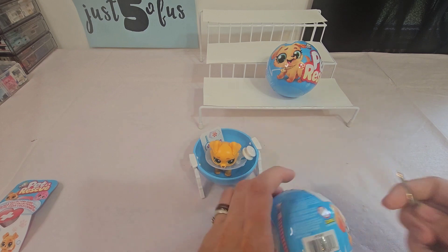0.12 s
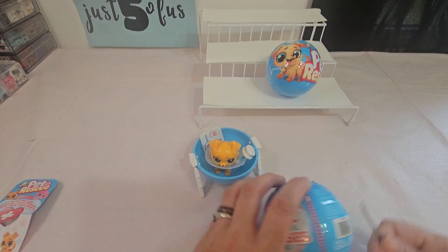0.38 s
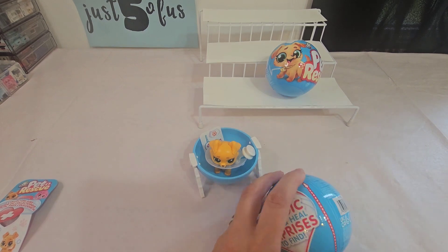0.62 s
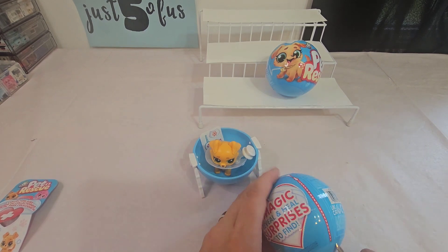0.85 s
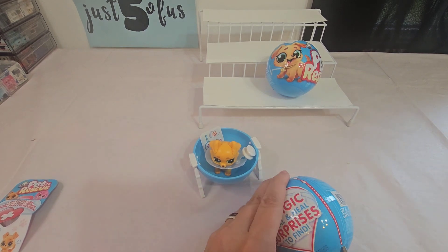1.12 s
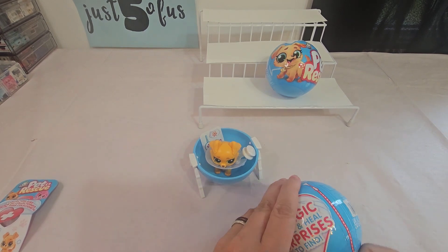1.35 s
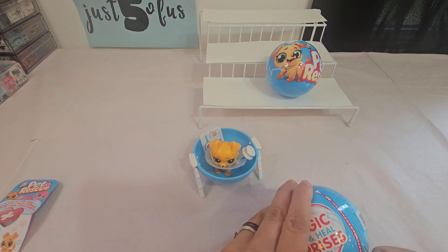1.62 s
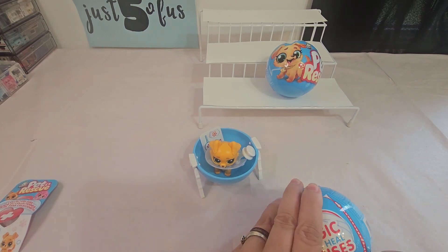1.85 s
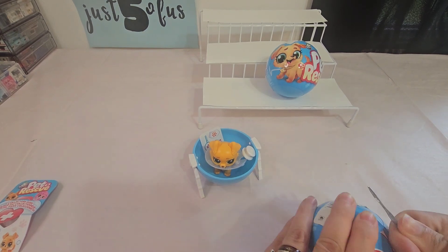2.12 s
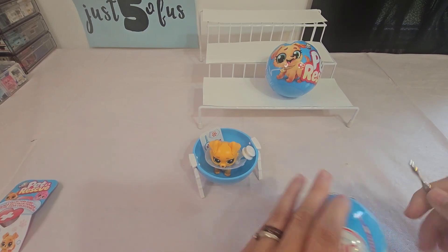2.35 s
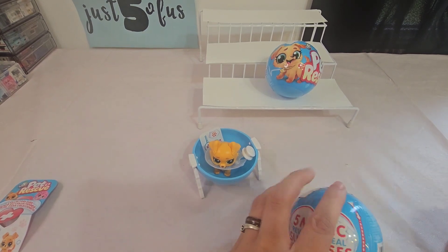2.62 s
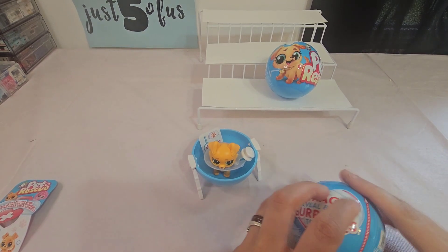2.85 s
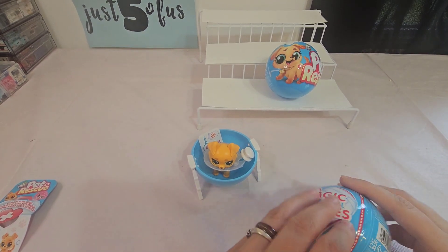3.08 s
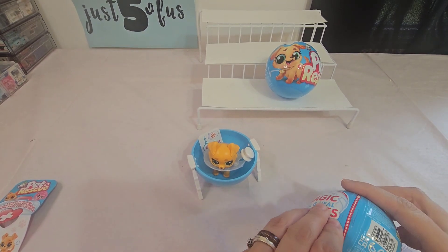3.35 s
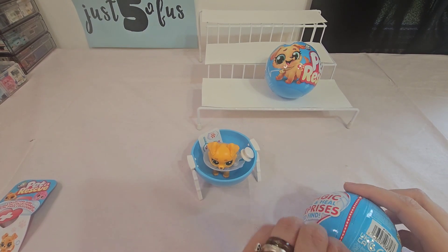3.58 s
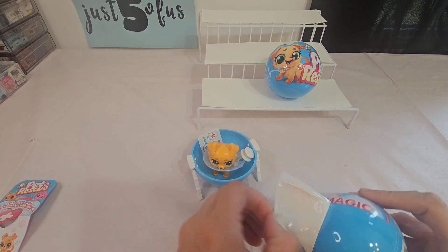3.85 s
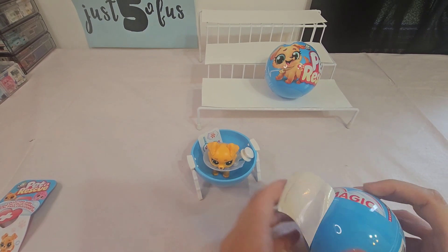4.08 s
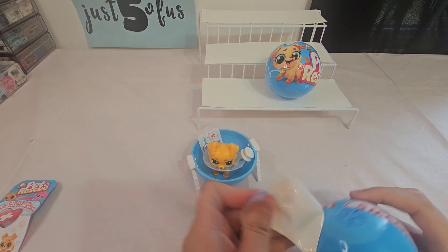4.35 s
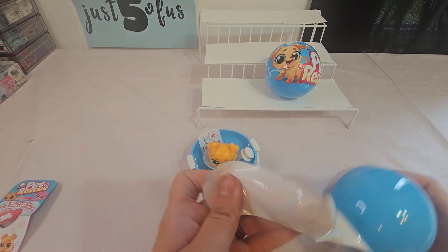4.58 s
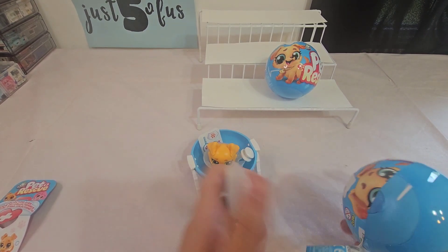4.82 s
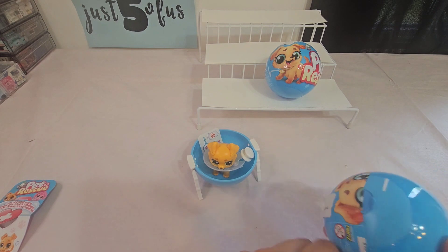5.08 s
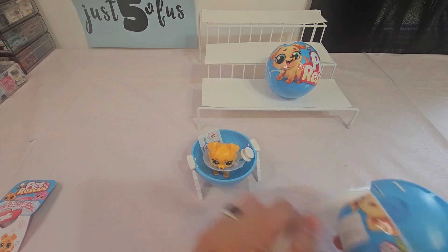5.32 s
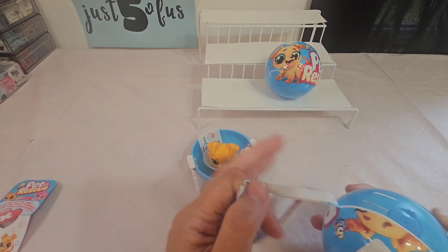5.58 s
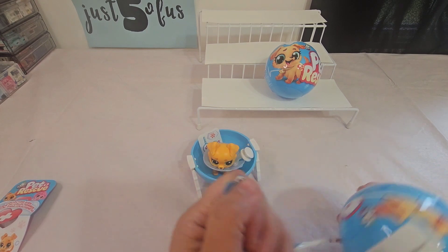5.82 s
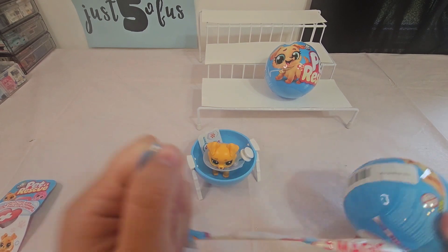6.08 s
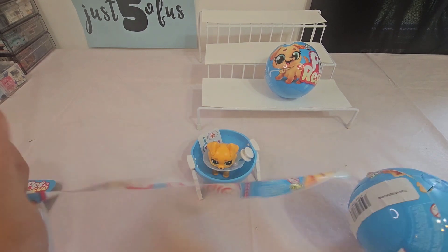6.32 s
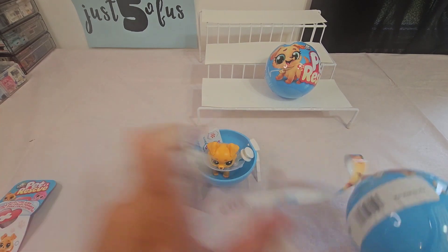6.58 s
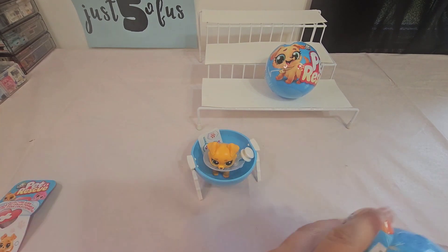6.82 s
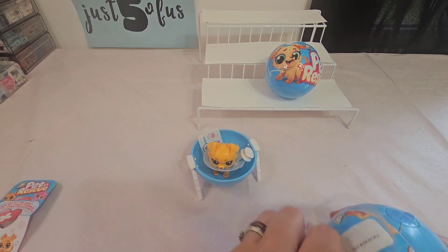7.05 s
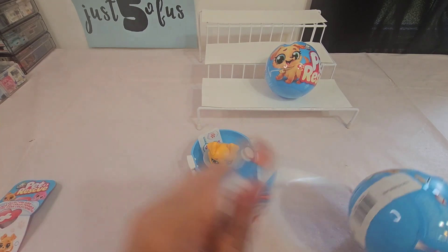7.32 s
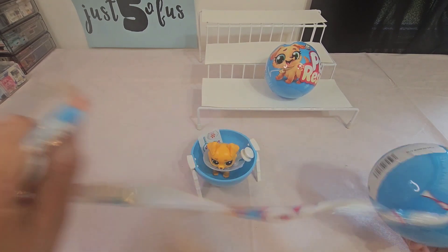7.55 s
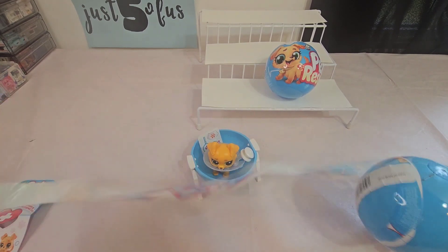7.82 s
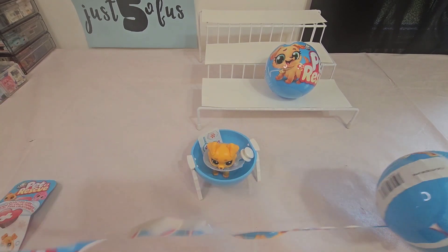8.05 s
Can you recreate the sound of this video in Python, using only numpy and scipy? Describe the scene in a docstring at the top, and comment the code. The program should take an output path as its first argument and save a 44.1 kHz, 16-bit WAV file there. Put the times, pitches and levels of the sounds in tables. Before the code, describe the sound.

Close up in a small quiet room, a hollow plastic ball thuds on a cloth-covered table and rubs briefly. Faint film ticks follow, with sharp snaps around two seconds. Near four seconds the shrink wrap starts tearing, bursting into loud dense crackling, then continuing in uneven crisp pops and rustles to the end. Stereo phone microphone, short soft echo, low hush.

```python
"""Film snaps, crackles and rustles while a hollow plastic ball thuds and rubs on a table, in a small quiet room.
Hands turn the ball on a cloth-covered table and peel its shrink film off, close to a phone.
Snaps are single bursts of shaped noise with a ring, rustle is noise driven by swarms of tiny creases,
thuds and drags are forces driving resonant table modes; a noise tail gives the echo, shaped noise the hush."""
import sys
import numpy as np
from scipy import signal
from scipy.fft import rfft, irfft, next_fast_len
from scipy.io import wavfile
from scipy.ndimage import uniform_filter1d

SR = 44100
rng = np.random.default_rng(int(sys.argv[2]) if len(sys.argv) > 2 else 0)


def put_to_file(sound):
    """Save the sound as 16-bit audio at rate SR, in the file named by the first command-line argument."""
    columns = np.atleast_2d(sound).T  # one column per channel
    safe = np.clip(columns, -1, 1)
    whole_steps = np.round(safe * 32767)
    wavfile.write(sys.argv[1], SR, whole_steps.astype(np.int16))


def boost_factor(decibels):
    """Convert a level in decibels to a linear amplitude factor."""
    exponent = np.asarray(decibels, float) / 20
    return 10 ** exponent


N = 360738

# where the hands work: t/s, left minus right/dB
HANDS = [(0.0, 6), (0.39, -3.5), (0.84, 4), (1.55, -4), (2.32, -2), (6.29, -1), (6.42, 4.5), (6.7, -2),
         (8.18, 4)]
# colour of the film as heard through the phone's ports: f/Hz, gain/dB
FILM = [(88, -50), (150, 1.5), (240, 5), (406, -2), (888, 0.5), (1170, 0), (1940, -1.5), (2100, -3.5),
        (4160, -2.5), (8560, -6), (11700, -6), (15100, 3.5), (16000, -32.5)]
# centres of the dull, middle and sizzle bands: f/Hz
BANDS_HZ = (900, 4200, 12000)


def colour(hz, points):
    """Gain at hz of (f/Hz, gain/dB) points, joined over log frequency."""
    f, db = np.transpose(points)
    return boost_factor(np.interp(np.log(hz + 1), np.log(f), db))


def shape(x, points):
    """Filters x with (f/Hz, gain/dB) points."""
    n = x.shape[-1]
    size = next_fast_len(n)
    gain = colour(np.fft.rfftfreq(size, 1 / SR), points)
    return irfft(rfft(x, size) * gain, size)[..., :n]


def unit(x):
    """Scales to rms 1."""
    return x / np.sqrt(np.mean(x ** 2))


def curves(rows):
    """Columns of a table, after its time column, at every sample."""
    s, *columns = np.transpose(rows)
    return [np.interp(np.arange(N) / SR, s, c) for c in columns]


def band(x, lo_hz, hi_hz):
    """Zero-phase band-pass, so that neighbouring bands add up."""
    return signal.sosfiltfilt(signal.butter(2, [lo_hz, hi_hz], "band", fs=SR, output="sos"), x)


def walk(rate_hz):
    """Random levels, rate_hz new ones a second, slewed from one to the next; spread near 1."""
    k = int(SR / rate_hz)
    held = np.repeat(rng.standard_normal(N // k + 1), k)
    return 1.42 * uniform_filter1d(held, k)[:N]


def gestures(rows, rise_db_per_s, fall_db_per_s, rest_db):
    """Level/dB of movements (start/s, hold/s, level/dB) that rise, hold and fall away; their powers add."""
    t = np.arange(0, N, 32) / SR
    power = boost_factor(2 * rest_db)
    for s, hold_s, db in rows:
        rise_db = rise_db_per_s * np.maximum(s - t, 0)
        fall_db = fall_db_per_s * np.maximum(t - s - hold_s, 0)
        power = power + boost_factor(2 * (db - rise_db - fall_db))
    return np.interp(np.arange(N) / SR, t, 10 * np.log10(power))


def ports(pan_db):
    """Left and right gains for a left minus right level."""
    return boost_factor(np.array([pan_db, -pan_db]) / 2)


def table(force):
    """The table top's modes, damped resonators driven by a force."""
    # f/Hz, level/dB, t60/s
    modes = [(60, -3.5, 0.25), (77.6, -3, 0.19), (106.3, -7, 0.19), (159.6, 2.5, 0.079), (252, -4, 0.11),
             (298.6, -12.5, 0.19), (403, -8, 0.05), (540, -21.5, 0.065), (665, -49, 0.054)]
    out = 0
    for hz, db, t60_s in modes:
        pole = np.exp(2j * np.pi * hz / SR - np.log(1000) / (t60_s * SR))
        out = out + boost_factor(db) * signal.lfilter([1], [1, -pole], force).imag
    return out


def room_tone(level_db=-58, alike_hz=500.):
    """Quiet hush: shaped noise, alike at both ports in the bass, unlike in the treble."""
    # colour of the hush: f/Hz, gain/dB
    hush = [(15, -32.5), (25, -27.5), (65, 2), (118, -1), (288, -5.5), (584, -18), (1360, -18),
            (2530, -29.5), (4730, -25.5), (5720, -39.5), (8830, -44.5), (10400, -111.5), (11900, -41),
            (15200, -101), (16500, -49)]
    mid, side = shape(rng.standard_normal((2, N)), hush)
    side = signal.lfilter(*signal.butter(1, alike_hz, "high", fs=SR), side)
    both = np.array([mid + side, mid - side]) / mid.std()
    return boost_factor(level_db) * both * boost_factor(0.55 * walk(6.0))


def drag(rise_db_per_s=310, fall_db_per_s=111, arms_db=-63.5):
    """An uneven rubbing force keeps the table rumbling; arms resting on it set the floor."""
    # ball rolled and hands dragged on the table top: start t/s, hold/s, level/dB
    drags = [(.22, 0.11, -44.5), (.45, 0.063, -42), (.9, 0.12, -57), (1.37, 0.066, -33), (1.56, 0.032, -38),
             (2.07, 0.064, -43), (2.5, 0.14, -57), (2.96, 0.036, -50), (3.35, 0.028, -52)]
    level_db = gestures(drags, rise_db_per_s, fall_db_per_s, arms_db)
    rub = signal.lfilter([1], [1, -.97], rng.standard_normal(N))
    force = rub * boost_factor(2.5 * walk(25))
    return boost_factor(level_db) * unit(table(force))


def rustle(per_s=1400.0, spread_db=4.0, smear_ms=1.43, rub=0.15, own=0.98):
    """Swarms of tiny creases of unequal size over a rubbing hiss; each patch of film flickers apart."""
    # tugs and rubs on the film: start t/s, hold/s, level/dB, dull part over it/dB, sizzle over it/dB
    tugs = [(0.166, 0.083, -55.5, -9, -26), (0.267, 0.089, -49, -3.5, -33),
            (0.404, 0.062, -50.5, -0.5, -32), (0.657, .03, -64, -1, -16), (0.731, 0.012, -48.5, 1.5, -25),
            (1.09, .04, -70.5, -25, -1), (1.369, 0.027, -43, -5, 1.5), (1.505, 0.026, -53.5, -3, -23),
            (1.558, 0.021, -45, -4, -1), (1.79, 0.011, -52, -9, -5.5), (2.02, 0.036, -36.5, -5, -14),
            (2.075, 0.087, -48, -3, -29), (2.532, .06, -55.5, -5, -3.5), (2.666, 0.045, -57, 7, -19),
            (2.74, 0.3, -67, 6, -15.5), (2.973, 0.17, -59, -9.5, -30), (3.823, 0.044, -44.5, -11, 1),
            (3.871, 0.021, -38, 1, -14), (4.046, 0.033, -56.5, 5.5, -9), (4.245, 0.039, -61.5, -8, -11),
            (4.347, 0.046, -35, -6, -12), (4.434, 0.081, -44.5, -4.5, -9), (4.58, 0.095, -31, -9.5, -7.5),
            (4.697, 0.017, -21, -9, -3.5), (4.748, 0.072, -33, -8.5, -21), (4.817, 0.21, -52, -9, -13),
            (5.114, 0.092, -45, -5, -6.5), (5.3, 0.078, -45, -8.5, -6), (5.446, 0.015, -32.5, -7.5, -14),
            (5.64, 0.061, -47, -7, -9), (5.794, 0.1, -39.5, -12.5, -13), (5.945, .12, -45.5, -9, -8),
            (6.149, 0.0046, -41, -3, -11), (6.182, 0.079, -33, -6, -1.5), (6.31, 0.21, -53, -10, -9),
            (6.568, 0.11, -44.5, -14, -11.5), (6.73, 0.15, -43.5, -8.5, -12.5),
            (6.88, 0.052, -52.5, -3, -14), (6.958, 0.19, -44.5, -10, -14), (7.22, 0.1, -54.5, -10, -8.5),
            (7.415, .04, -47, -12, -18), (7.471, 0.11, -40.5, -5.5, 0), (7.548, 0.028, -48.5, 5, 0),
            (7.613, 0.012, -28.5, -7, -8.5), (7.824, 0.054, -35.5, -10, -3.5),
            (7.868, 0.011, -33.5, -3.5, -10), (7.977, 0.032, -47, -2.5, -8.5), (8.048, 0.1, -53, -6, -14)]
    # edges of the film patches' bands: f/Hz
    edges_hz = (220, 600, 1300, 2300, 3600, 5500, 7500, 10000, 13000, 17000)
    rise_db_per_s, fall_db_per_s, rest_db = 793.5, 294, -75.5
    bunch_db, patchy_db = 1.5, 3.  # swell of the swarm, flicker of each patch

    s, hold_s, db, dull_over_db, sizzle_over_db = np.transpose(tugs)

    def level(over_db, rest_over_db):
        """Level/dB of one band through all tugs."""
        rows = zip(s, hold_s, db + over_db)
        return gestures(rows, rise_db_per_s, fall_db_per_s, rest_db + rest_over_db)

    level_db, dull_db, sizzle_db = level(0, 0), level(dull_over_db, 3.), level(sizzle_over_db, -11.)

    crease_db = spread_db * np.minimum(rng.exponential(size=N), 3)
    creases = (rng.random(N) < per_s / SR) * boost_factor(crease_db)
    swarm = unit(signal.lfilter([1], [1, -np.exp(-1000 / (smear_ms * SR))], creases))
    noise = rng.standard_normal((3, N)) * (swarm + rub) * boost_factor(bunch_db * walk(40))
    shared, apart = shape(noise[0], FILM), shape(noise[1:], FILM)

    out = 0
    for lo, hi in zip(edges_hz, edges_hz[1:]):
        hz = np.sqrt(lo * hi)
        dull, middle, sizzle = (np.interp(np.log(hz), np.log(BANDS_HZ), k) for k in np.eye(3))
        # the ports differ more towards the treble
        share = np.clip(own * min(hz / 3000, 1), 0, 1)
        patch = band(np.sqrt(1 - share ** 2) * shared + share * apart, lo, hi)
        patch_db = dull * dull_db + middle * level_db + sizzle * sizzle_db + patchy_db * walk(130)
        out = out + patch * boost_factor(patch_db)
    reference = band(shared, *edges_hz[3:7:3]).std()  # the middle patches
    return out / reference * ports(curves(HANDS)[0])


def thuds():
    """Soft half-sine pushes, settling unevenly, ring the table; a longer contact is duller."""
    # ball and hands meet the table: t/s, peak level/dB, contact/ms
    contacts = [(0.171, -18.5, 5.1), (0.397, -4.5, 1.95), (0.922, -47, 2.2), (1.793, -31.5, 7.5),
                (1.997, -20, 2.9), (2.398, -38, 4.5), (2.661, -34, 0.86), (2.703, -40, 1.5),
                (3.016, -25.5, 4.3), (3.217, -31.5, 9.4), (3.843, -38, 1.9), (4.561, -42, 1.9),
                (4.688, -33.5, 2), (6.183, -32.5, 0.5), (6.786, -38.5, 1.8), (7.865, -35.5, 1.7)]
    out = np.zeros(N + SR)
    ms = 1000 * np.arange(SR // 2) / SR
    for s, db, contact_ms in contacts:
        push = np.sin(np.pi * np.clip(ms / max(contact_ms, .5), 0, 1))
        settling = 1.5 * rng.standard_normal(len(ms)) * np.exp(-ms / 25)
        ring = table(push + settling)
        at = int(s * SR)
        out[at:at + len(ms)] -= ring * boost_factor(db) / np.abs(ring).max()
    return out[:N]


def snaps(decay_ms=2.68, rise_ms=0.18, own=0.74, lag_ms=0.058, bumps_db=3.5, fine=0.016, size=2048):
    """Each buckling crease or unsticking fingertip gives a tick and a few ms of rattling, ringing film."""
    # creases that buckle: t/s, peak level of the middle/dB, dull over middle/dB, sizzle over middle/dB, ring f/Hz
    creases = [(0.2157, -35.5, -7, -34, 2670), (0.246, -28, -19, -36, 4840),
               (0.2573, -20.5, -14, -31, 4000), (0.2722, -33, -11, -32, 1350), (0.285, -30, -19, -33, 1500),
               (0.306, -33, -19, -35, 3970), (0.3456, -33, -15, -32, 1540), (0.399, -24.5, -19, -29, 4260),
               (0.417, -31, -13.5, -34, 1230), (0.441, -24, -23, -29, 1220),
               (0.6402, -32.5, -13.5, -29, 1410), (0.662, -23.5, -24.5, -27, 3160),
               (0.7043, -28, -25, -17, 4900), (0.7348, -22, -14, -14, 5600), (0.9705, -40.5, -8, -34, 1230),
               (1.0774, -52, -13, 5, 1350), (1.112, -40, -41, -2, 4660), (1.134, -45, -25, 0, 4640),
               (1.27, -43.5, -24, -9, 4730), (1.3478, -34, -30, -11, 6660), (1.3546, -31, -23, -8, 4620),
               (1.3964, -34, -18, -1, 4970), (1.477, -30.5, -3.5, -23, 4760),
               (1.512, -27.5, -9, -12.5, 3120), (1.5276, -22, -24, -8, 4600), (1.5569, -35, -17, 5, 4550),
               (1.587, -22, -35, 5, 4240), (1.6795, -30, -15, -7, 4260), (1.7379, -42, -15, 9, 5270),
               (1.7848, -22.5, -22, -7.5, 1780), (2.0037, -8.5, -24, -9, 4500),
               (2.0117, -12, -18, -2, 4700), (2.0432, -24.5, -11, -23, 3080),
               (2.0595, -19, -18, -19.5, 1210), (2.0988, -19.5, -34, -39.5, 4380),
               (2.145, -21, -13, -24, 1300), (2.5415, -7, -15.5, -4, 5250), (2.6605, -34.5, -5, -18, 1340),
               (2.887, -44.5, -17, -47, 1220), (3.0708, -22.5, -17, -31, 1680),
               (3.101, -35, -12, -33, 1680), (3.1482, -42, -25.5, -38.5, 1860), (3.7893, -15, -11, 3, 1625),
               (3.8232, -6, -11, -2, 4100), (3.8323, -12.5, -21, -11, 3700), (3.8596, -3.5, -13, -10, 6150),
               (3.8836, -12.5, -13.5, -11, 1320), (3.8928, -9.5, -21.5, -6, 1320),
               (3.9498, -22.5, -32, -34, 1360), (4.0111, -14.5, -17, -15, 5600),
               (4.0406, -25.5, 1.5, -9, 4700), (4.0532, -8, -17, -4, 3460), (4.1639, -37.5, -11, -28, 1350),
               (4.2262, -34, -18.5, -19, 1330), (4.2825, -15, -18, -21, 4160),
               (4.2868, -20, -14, -17, 6260), (4.3071, -14.5, -20, -12.5, 2230),
               (4.3391, -7.5, -15.5, -11, 2900), (4.352, -5, -19, -12, 4220), (4.3614, -17, -20, -3, 5350),
               (4.3744, -18, -18, -3, 4170), (4.4077, -10.5, -14.5, -24, 1410),
               (4.4377, -7.5, -22, -14, 4540), (4.4471, -15.5, -29, -2, 4740),
               (4.4706, -17.5, -20, -41, 1520), (4.4887, -19.5, -11, -14.5, 1280),
               (4.5261, -24, -24.5, -27, 4150), (4.5423, -11.5, -10, -15, 4770),
               (4.5485, -10.5, -11, -22, 3620), (4.5778, -11, -7, -7, 2430), (4.5845, -8.5, -21, -6, 3800),
               (4.6065, -8, -19.5, -5, 3990), (4.613, 0.5, -12.5, -3, 6100), (4.6271, -16, -10, -15, 3840),
               (4.6345, -11.5, -10.5, -2, 3570), (4.6705, -13, -24, -11, 4200),
               (4.6944, -15, -21, -17, 5010), (4.702, -8, -13, -13, 5070), (4.7518, -9.5, -28, -15, 4300),
               (4.7714, -1.5, -21, -7.5, 3360), (4.8276, -25, -3, -20, 3460), (4.8588, -22, -8, -22, 4440),
               (4.8875, -11.5, -26.5, -11, 5140), (4.9108, -8.5, -15, -7, 4480),
               (5.0595, -20.5, -13, -10.5, 3730), (5.1112, -13.5, -9, -6, 4260),
               (5.1216, -7, -14, -5, 4100), (5.141, -9.5, -22, -25, 2860), (5.1636, -7.5, -15, -7.5, 3000),
               (5.1877, -23.5, -17, -14, 4610), (5.2014, -25, -17, -9, 3870),
               (5.2217, -13.5, -30, -3.5, 4420), (5.2973, -12.5, -21.5, 6, 4600),
               (5.3738, -10, -24, -29, 3100), (5.393, -22.5, -21, -5.5, 3280),
               (5.435, -13.5, -28, -10, 3650), (5.4505, -22, -17, -17, 4180), (5.479, -14, -24, -16, 1670),
               (5.4895, -16, -16, -11, 3040), (5.6237, -10.5, -19.5, -6.5, 4630),
               (5.6542, -14.5, -26.5, -12, 4370), (5.7263, -33, -14, -20, 1630),
               (5.7553, -21.5, -15, -23, 2990), (5.7706, -21.5, -16, -12, 1960),
               (5.789, -18, -27, -2, 3910), (5.816, -20, -21, -8, 4170), (5.8201, -15, -16.5, -11, 3920),
               (5.8462, -2, -25, -11, 4270), (5.8584, -4.5, -26.5, -16, 3900),
               (5.8861, -19, -10, -23, 1650), (5.9181, -12, -20, -17, 1710),
               (5.9274, -10.5, -30, -21.5, 4160), (6.13, -17, -10.5, 1, 1210),
               (6.1672, -25.5, -0.5, -7, 1530), (6.1806, -18.5, -2, -1, 4580), (6.2464, -20, -24, -2, 5150),
               (6.2637, -20, -19, 5, 3800), (6.3636, -17.5, -15.5, -9, 3930), (6.4343, -22, -32, -10, 6080),
               (6.4531, -18.5, -31, -14, 4700), (6.4818, -15, -28, -11, 4930),
               (6.5447, -27, -21, -15, 3040), (6.566, -15.5, -25, -5, 5100),
               (6.6447, -18.5, -45, -35, 4100), (6.715, -17.5, -18, -17, 4570),
               (6.754, -2.5, -34.5, -21.5, 2850), (6.8131, -21, -17, -46, 3180),
               (6.843, -21.5, -17, -23, 2790), (6.8648, -26.5, -20, -12, 3340),
               (6.9648, -24, -17, -3, 5100), (6.9864, -21.5, -29, -28.5, 5030),
               (7.0208, -30, -12, -15, 3750), (7.0549, -15, -27, -33, 3080),
               (7.0669, -11, -32, -31.5, 3230), (7.0935, -21.5, -15, -13, 3330),
               (7.1166, -4.5, -30.5, -13, 4060), (7.412, -25, -37, -9, 3040),
               (7.4428, -24.5, -12.5, 2, 4700), (7.4773, -21.5, -23, 13, 4400),
               (7.6031, -30, -19, -7, 4840), (7.6169, -26.5, -16, 0, 1190), (7.635, -10, -8.5, 6, 1970),
               (7.81, -5, -10.5, 1.5, 4560), (7.884, -12, -9, 13.5, 4970), (8.0257, -37, -12, -14, 5400),
               (8.0685, -35, -24, -24, 3980), (8.1052, -28, -23, -34, 2200)]
    # fingertips unstick from the tight film, thin bright ticks: t/s, peak level of the sizzle band/dB
    fingertips = [(1.4274, -28), (1.4975, -50), (1.551, -21.5), (1.5676, -22), (1.575, -19.5),
                  (1.751, -24.5), (1.7674, -31), (1.8018, -33), (1.8114, -31), (1.9624, -37), (7.4325, -28),
                  (7.4864, -15), (7.5004, -26), (7.5124, -24)]
    # widths of the dull, middle and sizzle bands: width/Hz
    widths_hz = (700, 7000, 5500)
    tip_sizzle_db, tip_dull_db, tip_ring_hz = 17.5, -20, 4530  # levels over the middle band
    tick, ring = 2., 1.3  # heights over the rattle
    scatter_db = 6.5  # creases lie left and right of the hands
    thin_hz, thin_db = 250., -9.  # a crease is too small to move much air in the bass

    out = np.zeros((2, N + size))
    ms, hz = 1000 * np.arange(size) / SR, np.fft.rfftfreq(size, 1 / SR)
    middle = (hz > 2000) & (hz < 9000)
    tips = [(s, db - tip_sizzle_db, tip_dull_db, tip_sizzle_db, tip_ring_hz) for s, db in fingertips]
    hands_db = curves(HANDS)[0]
    per_hz_db = 10 * np.log10(widths_hz[1] / np.array(widths_hz))
    # the two ports share the direct sound; table bounces differ, more so in the treble
    apart = np.clip(own * hz / 3500, 0, min(own, 1))

    for s, db, dull_db, sizzle_db, ring_hz in creases + tips:
        noise = rng.standard_normal((3, size))
        bumps = rng.standard_normal(13)
        length_chance, lag_chance, pan_chance = rng.standard_normal(3)

        # the buckle runs on in jerks along the crease; fine, bright creases are over sooner
        jerks = boost_factor(3.76 * np.repeat(rng.standard_normal(size // 16), 16))
        length_ms = decay_ms * np.exp(0.3 * length_chance - fine * max(sizzle_db, 0))
        fade = np.exp(-ms / length_ms) * jerks + tick * np.exp(-ms / 0.17)
        fade *= 1 - np.exp(-ms / rise_ms)

        bands_db = per_hz_db + (dull_db, 0, sizzle_db)
        gain = colour(hz, list(zip(BANDS_HZ, bands_db))) * colour(hz, FILM)
        gain *= colour(hz, [(thin_hz, thin_db), (BANDS_HZ[0], 0)])
        bumps_at = np.log(np.geomspace(300, 16000, num=13))
        gain *= boost_factor(bumps_db * np.interp(np.log(hz + 1), bumps_at, bumps))
        # the taut patch beside the crease rings briefly at a pitch set by its size
        gain = gain * (1 + ring / (1 + 1j * (hz - ring_hz) / (.1 * ring_hz)))

        direct, bounces = rfft(noise[0] * fade), rfft(noise[1:] * fade)
        both = gain * (np.sqrt(1 - apart ** 2) * direct + apart * bounces)
        peak = np.abs(irfft(both * middle)).max()
        both[0] *= np.exp(-2j * np.pi * hz * (lag_ms + 0.043 * lag_chance) / 1000)  # left port lags

        pan_db = hands_db[int(s * SR)] + scatter_db * pan_chance
        at = int(s * SR) - 64  # 64 samples of room for a negative lag
        burst = np.roll(irfft(both), 64, axis=1)
        out[:, at:at + size] += burst * ports(pan_db)[:, None] * boost_factor(db) / peak
    return out[:, :N]


def echo(x, level_db=-13.5, t60_s=0.18):
    """Walls return a short diffuse tail, different at each port."""
    t = np.arange(SR // 2) / SR
    tail = rng.standard_normal((2, len(t))) * boost_factor(-60 * t / t60_s) * np.clip(t / 0.0052, 0, 1)
    tail = shape(tail, [(90, -8), (250, 13.0), (1500, 5.0), (6000, -0.5), (16000, -2.0)])
    tail = tail / np.sqrt(np.sum(tail[0] ** 2))
    return boost_factor(level_db) * signal.fftconvolve(x, tail, axes=1)[:, :N]


def scene():
    """Film, table and room together; the phone's microphones drop the deepest bass of near sounds."""
    film = snaps() + rustle()
    wood = (thuds() + drag()) * ports(1.)[:, None]
    near = film + wood + echo(film + 0.68 * wood)
    bass_cut = signal.butter(4, 46., "high", fs=SR, output="sos")
    return signal.sosfilt(bass_cut, near) + room_tone()


def low_pass(x):
    """Removes everything above the highest recorded frequency."""
    return signal.sosfilt(signal.butter(12, 16960, fs=SR, output="sos"), x)


def record(dry, top_hz=16000, drive=1.15):
    """The ports ring and the left one is duller; the phone rounds peaks and cuts the top."""
    # resonances of the microphone ports: f/Hz, width/Hz, level/dB
    resonances = [(5070, 790, -11.5), (11570, 680, 9)]
    x = np.array([shape(dry[0], [(7000, 1.14), (13000, -6.5)]), dry[1]])
    for hz, width_hz, db in resonances:
        x = x + boost_factor(db) * signal.lfilter(*signal.iirpeak(hz, hz / width_hz, fs=SR), x)
    rounded = np.tanh(drive * x) / drive
    top_cut = signal.ellip(8, .2, 40, top_hz, fs=SR, output="sos")
    mix = signal.sosfilt(top_cut, rounded)
    return low_pass(mix)


dry = scene()
out = record(dry)
put_to_file(out)
```